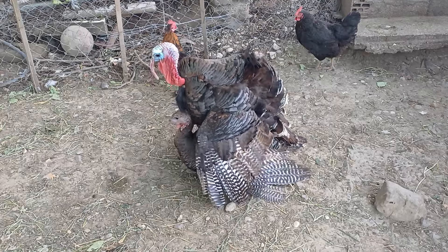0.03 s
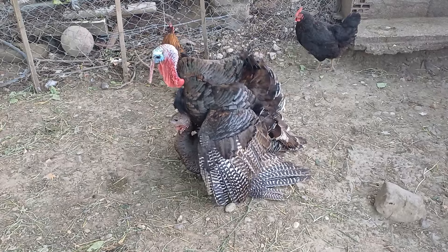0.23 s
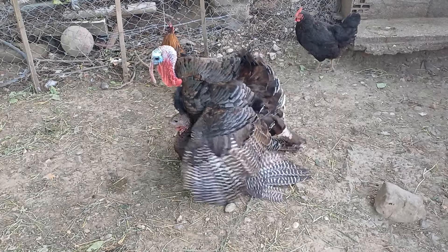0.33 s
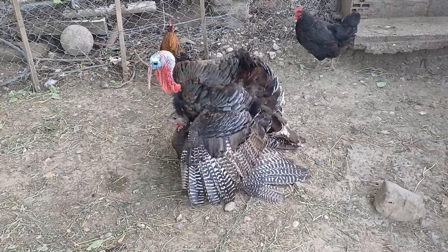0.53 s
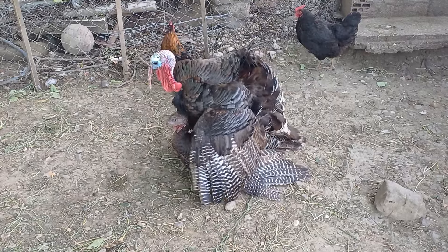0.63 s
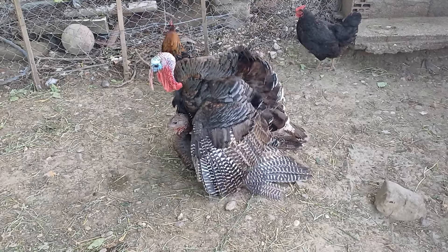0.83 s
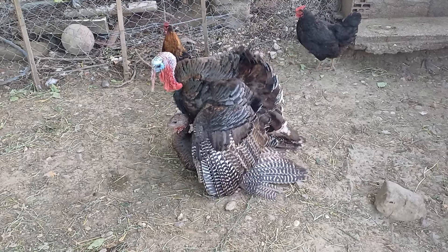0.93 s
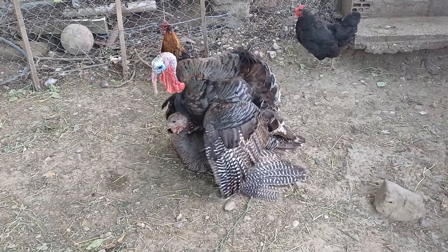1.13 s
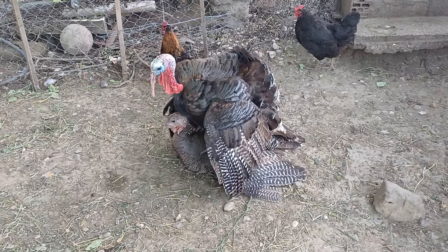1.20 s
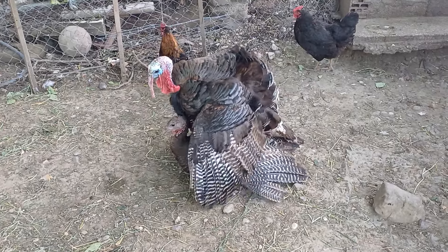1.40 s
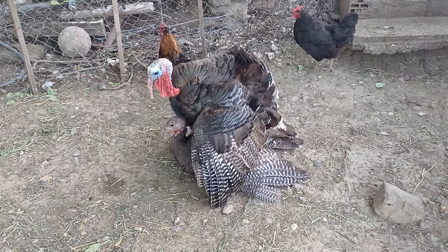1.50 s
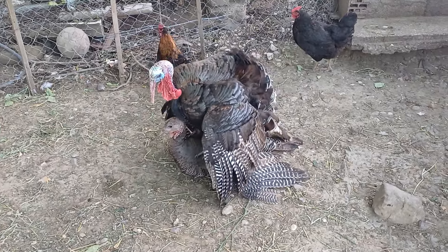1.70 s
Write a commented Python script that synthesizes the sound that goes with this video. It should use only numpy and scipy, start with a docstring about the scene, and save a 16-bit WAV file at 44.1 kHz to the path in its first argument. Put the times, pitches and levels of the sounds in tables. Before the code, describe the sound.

Hens cluck, moan and murmur quietly near the microphone in a dirt farmyard. A turkey's feathers rustle and its quills tick on the ground, then comes a soft chest thump and a distant moan, with faint chirps and steady hiss.

```python
"""Poultry in a dirt farmyard

Close and quiet, one hen gives a short hooting cluck while another moans, then moans again further
off: harmonic tones among soft sliding notes and hoarse throat pulses. A strutting turkey rustles
its feathers and scuffs the grit by friction, ticks its quills on the ground and rings its chest in
one soft low thump. Small birds chirp in glides, over faint low bumps and a steady hiss."""
import sys
import numpy as np
from scipy import signal
from scipy.fft import rfft, irfft
from scipy.io import wavfile
from scipy.ndimage import uniform_filter1d

SR = 44100
rng = np.random.default_rng(int(sys.argv[2]) if len(sys.argv) > 2 else 0)


def unload_audio(sound):
    """Save the sound as a 16-bit wav file, at the path given as the first command line argument."""
    columns = np.transpose(np.atleast_2d(sound))
    # keep every value between -1 and 1, then stretch to whole-number steps
    steps = np.round(np.clip(columns, -1, 1) * 32767)
    wavfile.write(sys.argv[1], SR, steps.astype(np.int16))


N = 77175


def cluck():
    """A periodic voice sounds a harmonic series; in this hoot the second harmonic leads."""
    # t/s, f/Hz, overtone level/dB, fundamental level/dB
    contour = [(.2, 464, -56, -64), (.211, 462, -41, -55), (.221, 461, -33.5, -49), (.241, 463, -30.5, -44),
               (.252, 462, -33, -44), (.262, 452, -44, -45), (.272, 442, -51, -50), (.285, 461, -45, -52),
               (.3, 461, -49, -55), (.33, 461, -60, -67)]
    # harmonic number, relative level/dB
    overtones = [(2, 0), (3, -21), (4, -24), (5, -29), (6, -40)]
    return hen(contour, overtones, jitter=.006, shimmer=.06)


def moans():
    """Random modulation roughens two held harmonic tones, the second lower and fainter."""
    # contours: t/s, f/Hz, overtone level/dB, fundamental level/dB
    near = [(0, 370.7, -61.5, -56.5), (.06, 372.3, -52, -103), (.086, 396.6, -54, -61.5),
            (.115, 373, -57, -72), (.2, 369.2, -60, -76), (.27, 374.5, -54, -54.5), (.32, 376, -67, -66.5),
            (.38, 377.8, -52.5, -67), (.45, 371.5, -61.5, -68), (.52, 365, -68.5, -61.5),
            (.595, 369, -63, -61.5), (.625, 362.2, -59, -79)]
    far = [(1.5, 320, -78, -80), (1.54, 320, -65, -71), (1.59, 314, -73, -78), (1.615, 317, -64, -78),
           (1.68, 323, -63, -75), (1.75, 334, -62.5, -76)]
    # overtones: harmonic number, relative level/dB
    near_tone = [(2, 4), (3, -22), (4, -32), (5, -26), (6, -36)]
    far_tone = [(2, 0), (3, -19), (4, -21), (5, -19), (6, -13)]
    return hen(near, near_tone, jitter=.017, shimmer=.42), hen(far, far_tone, jitter=.011, shimmer=.33)


def hen(contour, overtones, jitter, shimmer, shimmer_step=.3):
    """Superposition of harmonics: the higher an overtone lies, the more its amplitude flutters."""
    times, hz, upper_db, low_db = np.transpose(contour)
    t = np.arange(N) / SR
    pitch = np.interp(t, times, hz) * (1 + jitter * wander(144))
    phase = 2 * np.pi * np.cumsum(pitch) / SR
    upper = np.zeros(N)
    for k, (harmonic, db) in enumerate(overtones):
        flutter = 1 + (shimmer + k * shimmer_step) * wander(82)
        upper += amp(db) * np.sin(harmonic * phase) * unit(flutter)
    upper = unit(upper) * amp(np.interp(t, times, upper_db))
    fundamental = unit(np.sin(phase)) * amp(np.interp(t, times, low_db))
    gate = uniform_filter1d(((t >= times[0]) & (t <= times[-1])) * 1., size=200)
    return (upper + fundamental) * gate


def soft_notes():
    """Frequency modulation: the hens' nearly pure notes slide and waver."""
    # t/s, duration/s, first f/Hz, last f/Hz, level/dB
    notes = [(.066, 0.038, 792.3, 808, -51), (.07, 0.036, 1042, 1040, -62.5),
             (.155, 0.065, 1163, 1070, -57.5), (.189, 0.021, 1110, 1046, -48),
             (.155, 0.025, 611, 650, -54.5), (.271, 0.0236, 572, 654, -44.5), (.39, 0.083, 951, 930, -57.5),
             (.47, 0.023, 488, 463, -56), (.575, 0.024, 776, 753, -56), (.63, 0.048, 711.5, 683, -60),
             (.672, 0.047, 558, 458, -62), (.93, 0.063, 507, 470, -69), (1.0, 0.062, 606, 620, -69),
             (1.49, 0.031, 1097, 876, -67.5), (1.705, 0.035, 562, 570, -65.5)]
    return slides(notes, jitter=.0304, overtone_db=-20.5)


def murmurs(rate_hz=95, jitter=.3):
    """Source and filter: uneven pulses and breath excite the resonances of a hen's throat."""
    # t/s, duration/s, level/dB
    breaths = [(-.06, .2, -57), (.13, 0.18, -59.5), (.26, 0.054, -54.5), (.32, 0.14, -58.5),
               (.46, 0.094, -56.5), (.53, 0.13, -65.5), (.85, .04, -83), (.92, 0.11, -68.5),
               (1.14, 0.21, -68), (1.37, 0.19, -68.5), (1.485, 0.072, -64.5), (1.66, 0.11, -68)]
    # throat response: f/Hz, relative level/dB
    throat = [(100, -13.5), (250, -8), (380, -4), (500, 2), (700, -4), (950, -11.5), (1300, -32.5),
              (2200, -32.5), (3200, -38), (8000, -63)]
    cycles = np.cumsum(rate_hz * (1 + jitter * wander(59.96))) / SR
    pulses = np.diff(np.floor(cycles), prepend=0)
    source = unit(pulses) + rng.standard_normal(N)
    return unit(colour(source, throat)) * swells(breaths)


def feathers():
    """Friction between feathers: snaps so dense that they merge into a bright rustle."""
    # t/s, duration/s, level/dB
    strokes = [(-.05, 0.19, -57), (.23, 0.059, -58), (.33, 0.066, -55.5), (.44, 0.053, -58),
               (.69, 0.086, -63.5), (.745, 0.09, -52.5), (.82, 0.058, -52), (.905, 0.028, -51),
               (.93, 0.41, -63), (1.28, 0.31, -62), (1.67, 0.1, -59.5)]
    # f/Hz, relative level/dB
    spectrum = [(300, -41), (1500, -26), (2800, -4.5), (4200, -2), (7000, -2.5), (9000, -7), (11000, -2.5),
                (13000, 6), (16000, -5)]
    return friction(strokes, spectrum, per_s=12000, spread_db=1.5)


def scuffs():
    """Sliding friction on dirt gives a dull mid-band noise."""
    # t/s, duration/s, level/dB
    strokes = [(-.04, 0.25, -61), (.135, 0.21, -55), (.3, 0.14, -56.5), (.44, 0.13, -66.5),
               (.78, 0.014, -59.5), (.864, 0.016, -56)]
    # f/Hz, relative level/dB
    spectrum = [(300, -12.5), (900, -2), (1400, 2.5), (2300, 3), (3000, -6.5), (4000, -11), (8000, -18.5),
                (16000, -34)]
    return friction(strokes, spectrum, per_s=1900, spread_db=-.5)


def grit():
    """Grains slip underfoot, and their impulses add up to a crunch."""
    # t/s, duration/s, level/dB
    crunches = [(.339, 0.0072, -60), (.348, 0.014, -53.5), (.357, 0.08, -68.5), (.48, 0.027, -64),
                (.78, 0.045, -72), (.864, .012, -63), (.913, 0.013, -57.5)]
    # f/Hz, relative level/dB
    spectrum = [(500, -32), (2200, -37), (3600, 0), (5300, -3.5), (7000, -26), (10000, -11), (16000, -43)]
    return friction(crunches, spectrum, per_s=2100, spread_db=1)


def quills(decay_s=.001):
    """A brief impact has a broad spectrum: each stiff quill gives a sharp tick."""
    # impacts: t/s, level before filtering/dB
    ticks = [(.254, -46), (.3515, -49), (.454, -43.5), (.7622, -41), (.789, -43), (.8425, -36.5),
             (.9143, -30), (.9168, -36)]
    # f/Hz, relative level/dB
    spectrum = [(300, -25), (2500, -11), (3400, -1), (4200, 2), (5200, -3), (7000, -2), (9000, -7),
                (11000, -3), (12500, 4), (16000, 5)]
    impacts, t = np.zeros(N), np.arange(SR // 50) / SR
    for start, db in ticks:
        add(impacts, start, amp(db) * np.exp(-t / decay_s))
    return colour(impacts * rng.choice([-1, 1], (2, N)), spectrum)


def thump(rise_s=.00094, low_cut_hz=203):
    """Damped resonance: a few quick pushes ring the modes of the turkey's chest."""
    # t/s, level before filtering/dB
    pushes = [(1.2197, -44), (1.2238, -38.5), (1.232, -37.5), (1.249, -46), (1.266, -49.5)]
    # f/Hz, relative level/dB, 60 dB decay time/s
    modes = [(248, -9, 0.073), (330, 8, 0.036), (435, -2.5, 0.023), (692, -13.5, 0.091), (1070, -14, 0.04)]
    out, t = np.zeros(N), np.arange(SR // 5) / SR
    ring = sum(amp(db - 60 * t / t60) * np.sin(2 * np.pi * hz * t) for hz, db, t60 in modes)
    ring *= 1 - np.exp(-t / rise_s)
    for start, db in pushes:
        add(out, start, amp(db) * ring / abs(ring).max())
    return signal.sosfilt(signal.butter(4, low_cut_hz, "high", fs=SR, output="sos"), out)


def chirps():
    """Small birds whistle downward frequency sweeps."""
    # t/s, duration/s, first f/Hz, last f/Hz, level/dB
    sweeps = [(.646, .016, 2150, 2085, -64), (.715, .065, 3100, 1507, -70.5), (.775, .05, 4900, 3480, -69),
              (.918, .05, 2650, 1810, -67)]
    return slides(sweeps, jitter=.028, overtone_db=-23)


def bumps():
    """A low tone only a few cycles long is heard as a bump with little pitch."""
    # t/s, duration/s, first f/Hz, last f/Hz, level/dB
    bursts = [(.045, .07, 67, 58, -68.5), (.15, 0.046, 140, 119, -67), (.24, 0.033, 69.4, 60, -69),
              (1.412, 0.014, 205, 102.6, -61), (1.418, 0.044, 56, 52.2, -67)]
    return slides(bursts, jitter=.1, overtone_db=-14)


def hiss(level_db=-59, patchy_db=2.0):
    """Partly coherent noise: steady air and microphone hiss, faintly patchy, most alike near 300 Hz."""
    # f/Hz, relative spectral density level/dB
    spectrum = [(25, -57), (60, -19.5), (100, -15.5), (160, -14), (300, -11.5), (520, -7.5), (850, -17),
                (1400, -13.5), (2150, -12), (2800, -14), (3900, -14), (6500, -11), (7600, -18), (9000, -21),
                (10800, -15), (12300, -11.5), (13600, -12.5), (15800, -12.5)]
    # f/Hz, left-right correlation
    coherence = [(50, 0.007), (300, 0.91), (700, 0.44), (1500, 0), (4000, 0.091), (15000, 0)]
    # f/Hz, left minus right level/dB
    balance = [(50, -26), (300, -3), (1000, -1.5), (3000, -7), (5000, -8), (9000, 0), (13000, 1.2)]
    hz = np.fft.rfftfreq(1024, 1 / SR)
    a, b, c, d, patches = rng.standard_normal((5, N // 256 + 5, len(hz)))
    patches = uniform_filter1d(patches, size=12, axis=0)  # smooth in time
    patches = unit(uniform_filter1d(patches, size=14, axis=1))  # and in frequency
    alike = read(coherence, hz)
    left = a + 1j * b
    right = alike * left + np.sqrt(1 - alike ** 2) * (c + 1j * d)
    side = np.array([.5, -.5])[:, None, None]
    gain = amp(read(spectrum, hz) + patchy_db * patches + side * read(balance, hz))
    frames = np.array([left, right]) * gain
    air = signal.istft(frames.transpose(0, 2, 1), nperseg=1024, noverlap=768)[1][:, :N]
    return unit(air) * amp(level_db)


def friction(strokes, spectrum, per_s, spread_db):
    """Shot noise: tiny snaps of varied size come at random, swelling with each stroke."""
    sizes = amp(spread_db * np.minimum(rng.exponential(1, N), 2))
    occurs = rng.random(N) < per_s / SR
    snaps = sizes * occurs * rng.standard_normal((2, N))
    return unit(colour(snaps, spectrum)) * swells(strokes)


def slides(notes, jitter, overtone_db):
    """Phase is the integral of frequency: short glides, each with a weak octave."""
    out = np.zeros(N)
    for start, length, first, last, db in notes:
        envelope = arch(length)
        hz = np.geomspace(first, last, len(envelope)) * (1 + jitter * wander(100)[:len(envelope)])
        phase = 2 * np.pi * np.cumsum(hz) / SR
        tone = np.sin(phase) + amp(overtone_db) * np.sin(2 * phase)
        add(out, start, np.sqrt(2) * amp(db) * envelope * tone)
    return out


def place(x, pan_db, wet_db, lead_ms=0):
    """Level and time differences set direction (positive is left); walls and fences scatter an echo."""
    # f/Hz, reverberation time/s
    yard = [(100, 0.6), (400, 0.14), (1000, 0.68), (3000, 0.42), (12000, 0.45)]
    size = N + SR // 2
    hz = np.fft.rfftfreq(size, 1 / SR)
    reflections = rng.standard_normal((2, SR // 2)) * (rng.random((2, SR // 2)) < .05)
    reflections[:, :SR // 200] = 0  # none in the first 5 ms
    f, t, frames = signal.stft(reflections, SR, nperseg=256)
    decay = amp(-60 * t / read(yard, f)[:, None])
    tail = signal.istft(frames * decay, SR, nperseg=256)[1]
    side = np.array([[.5], [-.5]])
    direct = amp(side * pan_db) * np.exp(2j * np.pi * hz * side * lead_ms / 1000)
    echo = amp(wet_db) * rfft(tail / np.linalg.norm(tail[0]), size)
    return irfft(rfft(x, size) * (direct + echo), size)[:, :N]


def amp(db):
    """Amplitude ratio of a level in decibels."""
    return 10 ** (np.asarray(db) / 20)


def unit(x):
    """Normalisation to rms 1."""
    return x / np.sqrt(np.mean(x ** 2) + 1e-20)


def read(points, hz):
    """Interpolation on a log-frequency axis."""
    f, value = np.transpose(points)
    return np.interp(np.log(hz + 1), np.log(np.maximum(f, 1)), value)


def add(mix, start_s, sound):
    """Superposition of a delayed sound on the mix."""
    at = round(start_s * SR)
    sound = sound[max(-at, 0):]
    part = mix[max(at, 0):][:len(sound)]
    part += sound[:len(part)]


def colour(x, spectrum):
    """Linear filtering that conserves the power of white noise."""
    gain = unit(amp(read(spectrum, np.fft.rfftfreq(N, 1 / SR))))
    return irfft(rfft(x) * gain, N)


def wander(cutoff_hz):
    """Random fluctuation: low-passed noise of rms 1."""
    rolloff = 1 + (np.fft.rfftfreq(N, 1 / SR) / cutoff_hz) ** 4
    return unit(irfft(rfft(rng.standard_normal(N)) / rolloff, N))


def arch(length_s):
    """Half-sine envelope."""
    return np.sin(np.linspace(0, np.pi, max(round(length_s * SR), 8)))


def swells(strokes):
    """Amplitude envelope of a series of strokes."""
    out = np.zeros(N)
    for start, length, db in strokes:
        add(out, start, amp(db) * arch(length))
    return out


def scene():
    """Sound pressures add: every source from its place in the yard."""
    near_moan, far_moan = moans()
    hens = place(cluck(), pan_db=-.5, wet_db=-18, lead_ms=-.13)
    hens += place(near_moan, pan_db=-.7, wet_db=-11, lead_ms=.22)
    hens += place(far_moan, pan_db=-1, wet_db=-10, lead_ms=.28)
    hens += place(soft_notes(), pan_db=2.2, wet_db=-4, lead_ms=-.16)
    hens += place(murmurs(), pan_db=-.3, wet_db=-4.5)
    turkey = place(feathers(), pan_db=0, wet_db=-7)
    turkey += place(scuffs(), pan_db=-1, wet_db=-8)
    turkey += place(grit(), pan_db=-8, wet_db=-2)
    turkey += place(quills(), pan_db=.5, wet_db=-7)
    turkey += place(thump(), pan_db=-.8, wet_db=-10.5, lead_ms=-.27)
    background = place(chirps(), pan_db=-5, wet_db=-15, lead_ms=.0089)
    background += place(bumps(), pan_db=-.5, wet_db=-15)
    return hens + turkey + background + hiss()


def record(dry):
    """Band limiting: a steep low-pass filter removes the highest treble."""
    lowpass = signal.firwin(511, cutoff=16020, window=("kaiser", 9), fs=SR)
    return signal.oaconvolve(dry, lowpass[None], "same")


dry = scene()
out = record(dry)
unload_audio(out)
```